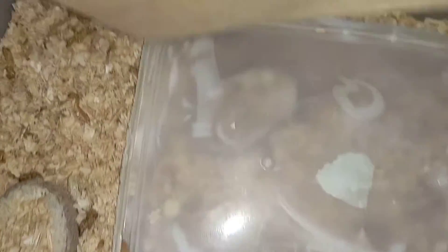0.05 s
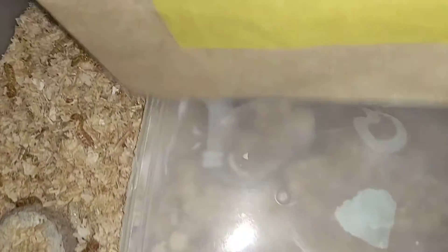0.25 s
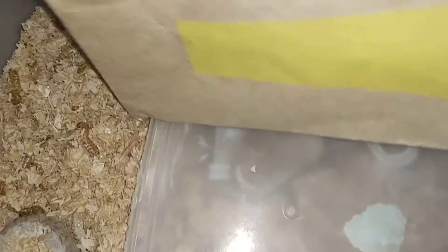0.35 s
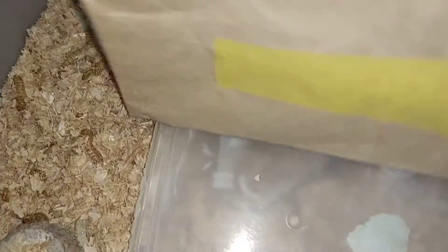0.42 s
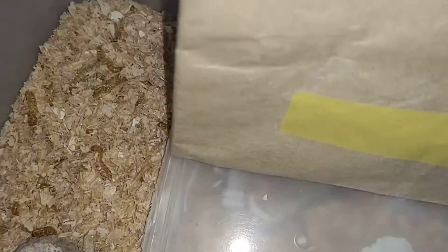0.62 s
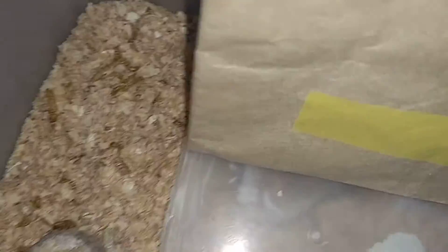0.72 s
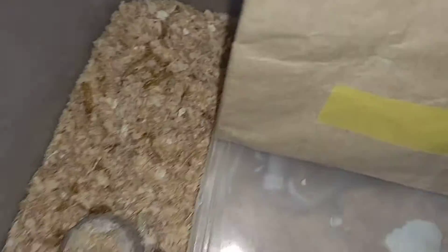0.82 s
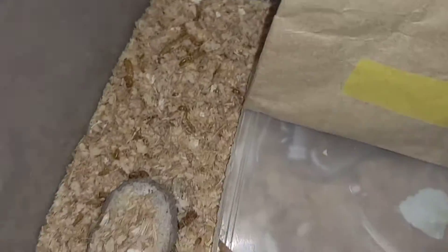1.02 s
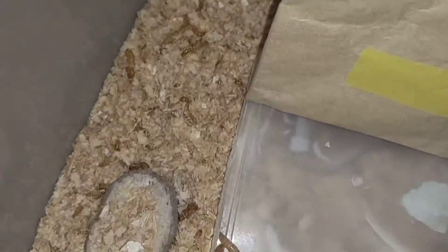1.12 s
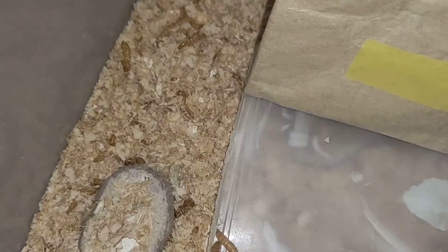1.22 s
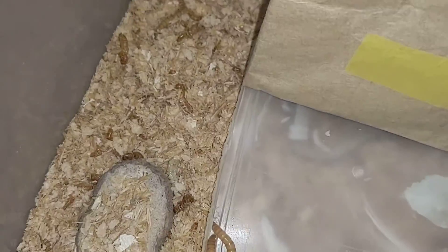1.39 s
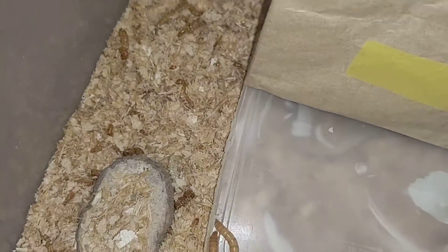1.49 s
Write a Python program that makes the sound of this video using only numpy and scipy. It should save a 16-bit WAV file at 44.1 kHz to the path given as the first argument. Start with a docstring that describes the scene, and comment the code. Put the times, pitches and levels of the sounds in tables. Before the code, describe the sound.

A paper package scrapes and snaps as it is pushed over a hollow plastic box, which thuds softly. It lands with one sharp knock, then settles with faint crinkles, close up in a quiet room.

```python
"""A paper package scrapes and snaps as it is pushed over a hollow plastic box, close up in a quiet room.
The scrape is a stream of tiny fibre slips, fuller under pressure; each buckle of the paper is a snap.
The box thuds at each shove and rings in one sharp knock as the package lands, then the paper settles
with faint crinkles. The right microphone faces away and hears little treble."""
import sys
import numpy as np
from scipy import signal
from scipy.fft import irfft
from scipy.io import wavfile

SR = 44100
rng = np.random.default_rng(int(sys.argv[2]) if len(sys.argv) > 2 else 0)


def to_wav(s):
    """Save 16-bit WAV."""
    ch = np.atleast_2d(s).T  # columns
    pcm = np.round(np.clip(ch, -1, 1) * 32767)  # PCM
    wavfile.write(sys.argv[1], SR, pcm.astype(np.int16))


N = 68355
TIME = np.arange(N) / SR


def amp(db):
    """Decibels to gain."""
    return 10 ** (np.asarray(db) / 20)


def unit(x):
    """Scales to rms 1."""
    return x / np.sqrt(np.mean(x ** 2) + 1e-20)


def read(points, hz):
    """Reads a table on a log-frequency axis."""
    f, value = np.transpose(points)
    return np.interp(np.log(hz + 1), np.log(f + 1), value)


def add(mix, s, sound):
    """Mixes a sound in at s seconds."""
    part = mix[..., max(round(s * SR), 0):][..., :sound.shape[-1]]
    part += sound[..., :part.shape[-1]]


def eq(x, curve, keep_power=True, size=4096):
    """Minimum-phase EQ; keep_power holds white noise at the same level."""
    log_gain = np.log(amp(read(curve, abs(np.fft.fftfreq(size, 1 / SR)))))
    taps = np.fft.ifft(np.exp(np.conj(signal.hilbert(log_gain)))).real[:size // 2]
    taps = taps / (np.linalg.norm(taps) if keep_power else 1)
    return signal.fftconvolve(x, taps[None], axes=1)[:, :x.shape[1]]


def ring(x, response):
    """Plays a sound through an impulse response."""
    return signal.fftconvolve(x, np.atleast_2d(response), axes=1)[:, :N]


def mode(hz, t60, rise_s, turn=0):
    """One dying resonance with a soft attack."""
    t = TIME[:SR // 2]
    envelope = np.minimum(t / rise_s, 1) ** 2 * amp(-60 * t / t60)
    return envelope * np.sin(2 * np.pi * (hz * (t - rise_s) + turn))


def white(n):
    """Two channels of random-sign noise."""
    return rng.choice([-1., 1.], (2, n))


# Stereo image, wider toward the top (frequency [Hz], left-right correlation [0-1])
IMAGE = [(50, .65), (400, 0.6), (1500, 0.22), (4000, 0.23), (12000, 0.091)]
def stereo(x, size=512):
    """Makes two unrelated channels partly alike."""
    hz, _, (left, other) = signal.stft(x, SR, nperseg=size)
    same = read(IMAGE, hz)[:, None]
    right = same * left + np.sqrt(1 - same ** 2) * other
    return signal.istft(np.array([left, right]), SR, nperseg=size)[1][:, :x.shape[1]]


# Room tone spectrum (frequency [Hz], density [dB])
ROOM_TONE = [(30, -34), (60, -12.5), (100, 0.5), (150, -11), (200, -11.5), (320, -3.5), (480, -24.5),
             (620, -12), (800, -20.5), (1000, -16.5), (2000, -26.5), (3500, -27.5), (5500, -34.5),
             (16000, -39.5)]
def room_tone(left_db=-64, right_db=-68.5, hum_hz=203.8, hum_width_hz=5.5, hum_db=-66.5):
    """A quiet bed of air with a faint, wavering hum."""
    air = unit(eq(stereo(rng.standard_normal((2, N))), ROOM_TONE))
    hz = np.fft.rfftfreq(N, 1 / SR)
    hum_band = np.exp(2j * np.pi * rng.random(len(hz))) / (1 + ((hz - hum_hz) / hum_width_hz) ** 2)
    return amp([[left_db], [right_db]]) * air + amp(hum_db) * unit(irfft(hum_band, N))


# Reverb decay (frequency [Hz], t60 [s])
ROOM_DECAY = [(80, 1), (300, 0.19), (1000, 0.46), (3000, 0.049), (10000, 0.18)]
def reverb(x, size=256):
    """Room reflections, each band dying at its own speed."""
    hz, t, bands = signal.stft(stereo(white(SR // 2)), SR, nperseg=size)
    t60 = read(ROOM_DECAY, hz)[:, None]
    tail = signal.istft(bands * amp(-60 * t / t60) / np.sqrt(t60), SR, nperseg=size)[1]
    return ring(x, tail / np.linalg.norm(tail, axis=1, keepdims=True))


# Off-axis EQ of the right microphone (frequency [Hz], gain [dB])
OFF_AXIS = [(60, 1.5), (250, -0.5), (600, -9), (1200, -11.5), (3000, -23), (5000, -26.5), (12000, -16)]
def off_axis(x):
    """The right microphone faces away, so its side is duller."""
    return np.vstack([x[:1], eq(x[1:], OFF_AXIS, keep_power=False)])


# Low thuds of the box (time [s], level [dB], pitch [Hz], t60 [s])
THUD_CUES = [(0.135, -39.5, 90.6, 0.25), (0.213, -39, 82, 0.12), (0.362, -40, 92.5, 0.29),
             (0.393, -30.5, 98, 0.096), (0.439, -38.5, 76, 0.1), (0.531, -41.5, 72, 0.33),
             (0.605, -35, 79, 0.31), (0.706, -47, 76.8, 0.3)]
def thuds(rise_s=0.0059, lag_turns=0.052, right_db=0.5):
    """The hollow box booms at each shove, its phase lagging on the right."""
    out = np.zeros((2, N))
    for s, db, hz, t60 in THUD_CUES:
        left = mode(hz, t60, rise_s)
        right = amp(right_db) * mode(hz, t60, rise_s, -lag_turns)
        add(out, s, amp(db) * np.array([left, right]))
    return out


# Modes of the plastic box (frequency [Hz], level [dB], t60 [s])
BOX_MODES = [(117, -34.5, 0.17), (170, -26.5, 0.3), (331, -14, 0.077), (633, -18, 0.063), (1053, -13, 0.05),
             (1234, -10.5, 0.03), (1620, -12, 0.06), (2120, -22.5, .02), (2280, 11.5, 0.0044),
             (2730, 3.5, 0.014), (3010, -8, 0.025), (5440, -19.5, 0.021)]
KNOCK_RISE_S = 0.001198
def box_ring():
    """The box's modes, reaching the right microphone slightly out of phase."""
    turns = rng.uniform(-0.011, 0.054, len(BOX_MODES))
    return sum(amp(db) * np.array([mode(hz, t60, KNOCK_RISE_S), mode(hz, t60, KNOCK_RISE_S, turn)])
               for (hz, db, t60), turn in zip(BOX_MODES, turns))


# Tone of the knock's transient (frequency [Hz], gain [dB])
CRACK_EQ = [(820, -26), (1100, 10.5), (1600, -18.5), (2700, 6.5), (3500, -1), (5500, -13), (15000, -34.5)]
def knock(at_s=0.6035, ring_db=-12.5, crack_db=-18, crack_decay_s=0.0045):
    """The package lands: a sharp crack on top of the ringing box."""
    out, t = np.zeros((2, N)), TIME[:SR // 2]
    envelope = np.minimum(t / KNOCK_RISE_S, 1) * np.exp(-t / crack_decay_s)
    crack = eq(stereo(white(len(t))) * envelope, CRACK_EQ)
    add(out, at_s, amp(ring_db) * box_ring() + amp(crack_db) * crack)
    return out


def slips(per_s=7000, spread_db=3, bunch_db=1.5, bunch_s=0.0035):
    """Grains of slipping paper fibre, in uneven bunches, a few of them large."""
    sizes = amp(spread_db * np.minimum(rng.exponential(1, N), 4))
    fires = rng.random(N) < per_s / SR
    grains = stereo(sizes * fires * white(N))
    bunches = np.interp(TIME / bunch_s, np.arange(N), unit(rng.uniform(-1, 1, N)))
    return unit(grains * amp(bunch_db * bunches))


# Brief scratches (time [s], level [dB])
CATCH_CUES = [(.092, -61), (.238, -50.5), (0.289, -52.5), (.664, -53), (0.675, -60.5), (0.723, -66),
              (.761, -60), (.986, -69), (.999, -67)]
# Their bright tone (frequency [Hz], gain [dB])
SCRATCH_EQ = [(2000, -17.5), (6500, 1.5), (9000, -2), (15000, -15)]
def catches(rise_s=0.0025):
    """The paper's edge catches and lets go in a short, hissy flurry of slips."""
    flurry, age = np.zeros(N), TIME[:SR // 2] / rise_s
    for s, db in CATCH_CUES:
        add(flurry, s, amp(db) * age * np.exp(1 - age))
    return eq(slips() * flurry, SCRATCH_EQ)


# Resonances of the package (frequency [Hz], width [Hz], boost [dB])
PACKAGE_PEAKS = [(621.6, 45, 7.5), (1044, 30, 6.5), (1430, 76, 8.5), (1579, 59, 6.5), (2000, 32, 4),
                 (2620, 260, 3.5), (3306, 40, 4.5), (3646, 80, 4.5)]
def package(x, trim_db=-3.5):
    """The package colours the paper's sound with narrow peaks."""
    for hz, width, db in PACKAGE_PEAKS:
        x = x + (amp(db) - 1) * signal.lfilter(*signal.iirpeak(hz, hz / width, SR), x)
    return amp(trim_db) * x


# Paper snaps and bumps; body, edge and right are offsets from the level
# (time [s], level [dB], length [s], body [dB], edge [dB], right [dB], fold pitch [Hz])
SNAP_CUES = [(0.138, -63.5, 0.0039, 15.5, -7, 11, 398), (0.165, -45, 0.0032, -13, 5, 7, 3180),
             (0.212, -43, 0.0032, 4.5, 7.5, 12, 1470), (0.281, -35.5, 0.0022, -5, 3, 11, 2830),
             (0.3224, -29, 0.0023, -17, -3.5, 8, 2920), (0.376, -31, .0026, -6.5, -9, 15, 1430),
             (0.3956, -44, 0.0083, 14.5, -23, -11.5, 342), (0.432, -36.5, 0.012, -4.5, -24, 18, 1340),
             (0.4405, -30, 0.0074, 0.5, -1.5, 5.5, 1320), (0.512, -30, 0.0062, -0.5, -2, 8.5, 1172),
             (0.6164, -34, 0.0035, 4.5, 5, -25, 1650), (0.66, -39, 0.0041, -17, -5, 9, 1460),
             (0.706, -35.5, 0.0039, 6, -23, -1.5, 1007), (0.7624, -38, 0.0036, -0.5, -18, -3.5, 1076),
             (0.8967, -56.5, 0.006, 2.5, 5, -1, 2570), (0.938, -56.5, 0.0027, 0.5, 4, -1, 2760),
             (0.948, -55.5, 0.0027, 3.5, -3, -7, 3600), (1.001, -60.5, 0.0048, -18, 5.5, 2, 2680),
             (1.014, -49.5, 0.007, -35, -7, 2, 2650), (1.03, -51, 0.0064, -39, -1, 5, 2780),
             (1.077, -71, 0.015, 17.5, 5.5, -2, 2730), (1.2905, -66, .002, -23, 4.5, 0, 3320),
             (1.528, -53, 0.0074, -9.5, -16, -10, 1260)]
# A snap's layers: low body, mid panel, crisp edge (frequency [Hz], gain [dB])
BODY_EQ = [(40, -58.5), (120, -4), (230, -8), (335, 1.5), (480, -8.5), (640, -6), (900, -10.5),
           (8000, -85.5)]
PANEL_EQ = [(200, -41), (800, -12.5), (1100, 5), (1450, -2.5), (1850, 4.5), (2600, -5), (4000, -11.5),
            (8000, -46)]
EDGE_EQ = [(300, -25.5), (1500, -10.5), (2900, 6), (4200, 2), (5800, -4), (7500, -16.5), (15000, -26.5)]
# Tails of body, panel and edge (level [dB], t60 [s])
SNAP_TAILS = [(-5.5, 0.12), (-22, 0.059), (-17, 0.062)]
def snaps(fold_db=10, fold_t60_s=0.03, fold_lengths=6.5, panel_follow=0.36):
    """Each buckle of the paper bursts through its body, panel and edge, and rings one fold."""
    layers, folds, t = np.zeros((3, 2, N)), np.zeros((2, N)), TIME[:SR // 8]
    for s, db, length, body_db, edge_db, right_db, fold_hz in SNAP_CUES:
        burst = (2 * t / length) * np.exp(1 - 2 * t / length)
        gain = amp([[db], [db + right_db]])
        panel_db = panel_follow * min(body_db, 0)  # a light snap also shakes the panel less
        for layer, layer_db, (tail_db, t60) in zip(layers, (body_db, panel_db, edge_db), SNAP_TAILS):
            tail = np.minimum(t / length, 1) * amp(tail_db - 60 * t / t60)
            add(layer, s, gain * amp(layer_db) * np.hypot(burst, tail) * stereo(white(len(t))))
        fold_t60 = min(fold_t60_s, fold_lengths * length)  # quick snaps ring shorter
        add(folds, s, gain * amp(fold_db) * mode(fold_hz, fold_t60, length))
    crackle = sum(eq(layer, curve) for layer, curve in zip(layers, (BODY_EQ, PANEL_EQ, EDGE_EQ)))
    return folds + package(crackle)


# Envelopes of the slide and of the faint rub as the paper settles (time [s], level [dB])
SLIDE_ENVELOPE = [(0, -61.5), (.12, -54), (.16, -50.5), (.205, -48), (.24, -40), (.3, -44), (.35, -47),
                  (.405, -34.5), (.428, -43.5), (.45, -41), (.475, -47), (.5, -64.5), (.53, -63.5),
                  (.56, -46.5), (.595, -63.5), (.63, -40.5), (.71, -45), (.8, -103)]
SETTLE_ENVELOPE = [(.72, -55), (.775, -65.5), (.8, -71), (.83, -63.5), (.88, -76.5), (.945, -65),
                   (.98, -69), (1.02, -63.5), (1.06, -70.5), (1.2, -73.5), (1.435, -85), (1.455, -64.5),
                   (1.495, -72), (1.55, -65)]
# Paper under light and firm pressure, and the hollow rumble below (frequency [Hz], gain [dB])
LIGHT_EQ = [(100, -12.5), (400, -0.5), (1800, -5.5), (3000, 2), (4500, -0.5), (7000, -13), (15000, -20.5)]
FIRM_EQ = [(100, -23), (330, -2), (620, -3), (850, -6), (1450, -3), (2000, -5.5), (3000, -9.5),
           (4100, -8.5), (4600, -13), (5600, -14.5), (7000, -23.5), (15000, -36)]
RUMBLE_EQ = [(35, -36.5), (78, -5), (170, -3), (240, -12), (330, -0.5), (480, -11.5), (4000, -81.5)]
def scrape(light_db=-52.5, firm_db=-39, rumble_db=-3.5, settle_rumble_db=1, box_db=-8.5):
    """Slips grow louder and fuller with pressure, and shake the box under them."""
    slide_db = np.interp(TIME, *np.transpose(SLIDE_ENVELOPE), right=-120)
    settle = amp(np.interp(TIME, *np.transpose(SETTLE_ENVELOPE), left=-120))
    firmness = np.clip((slide_db - light_db) / (firm_db - light_db), 0, 1)  # crossfades the two tones
    slide, box = amp(slide_db), box_ring()
    firm = eq(slips() * slide * np.sqrt(firmness), FIRM_EQ)
    light = eq(slips() * (slide * np.sqrt(1 - firmness) + settle), LIGHT_EQ)
    rumble = eq(slips() * (slide + amp(settle_rumble_db) * settle), RUMBLE_EQ)
    rubbed_box = ring(slips() * (slide + settle), box / np.linalg.norm(box[0]))
    return package(firm + light) + amp(rumble_db) * rumble + amp(box_db) * rubbed_box


def scene(reverb_db=-13.5):
    """Close paper and box with a touch of reverb, duller on the right, over room tone."""
    close = scrape() + catches() + snaps() + knock() + thuds()
    return off_axis(close + amp(reverb_db) * reverb(close)) + room_tone()


def record(dry, low_cut_hz=29, high_cut_hz=16100):
    """A low cut and a steep high cut on the mix."""
    low_cut = signal.butter(4, low_cut_hz, "high", fs=SR, output="sos")
    high_cut = signal.firwin(511, high_cut_hz, window=("kaiser", 9), fs=SR)
    return signal.oaconvolve(signal.sosfilt(low_cut, dry), high_cut[None], "same")


dry = scene()
out = record(dry)
to_wav(out)
```